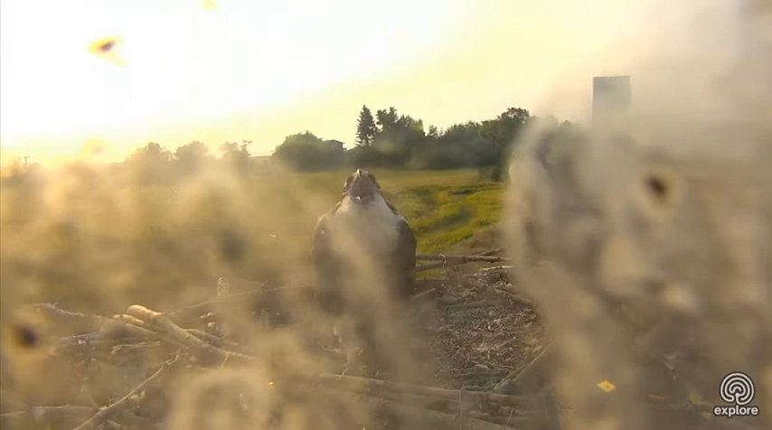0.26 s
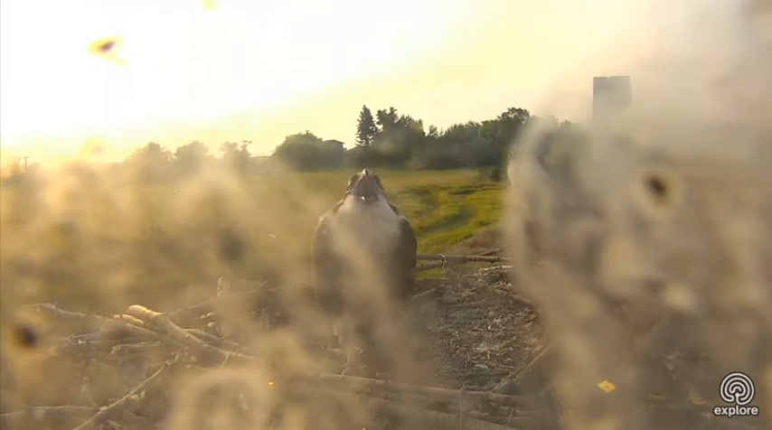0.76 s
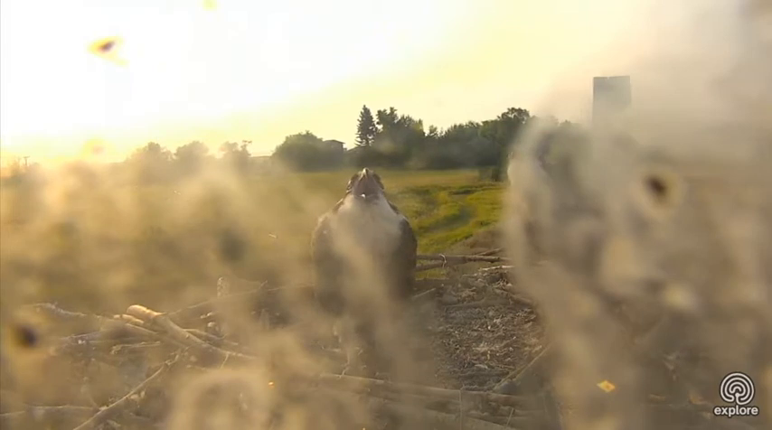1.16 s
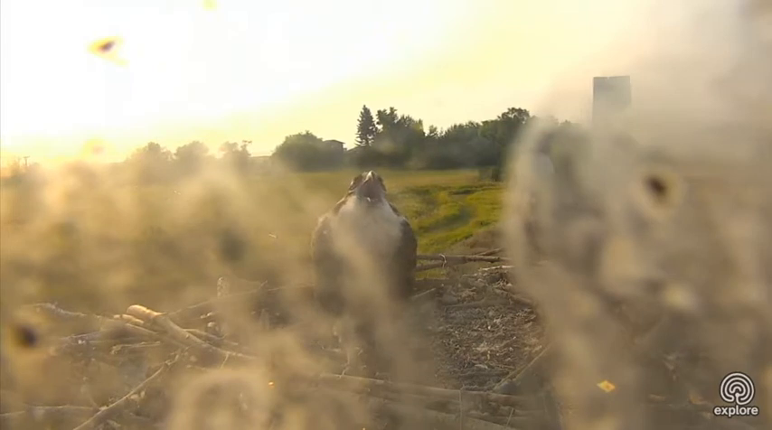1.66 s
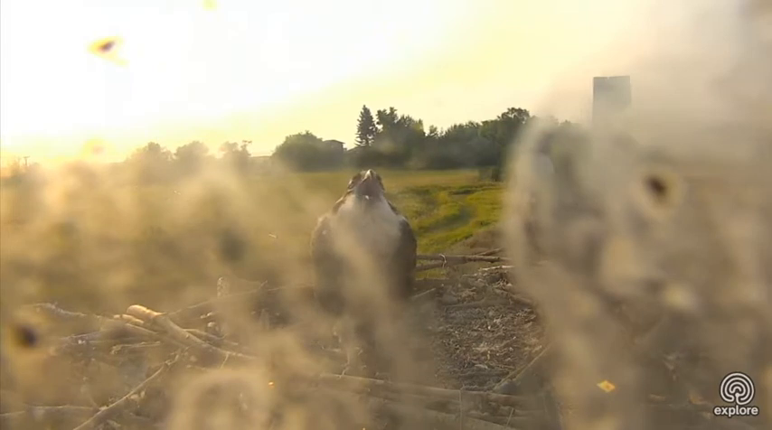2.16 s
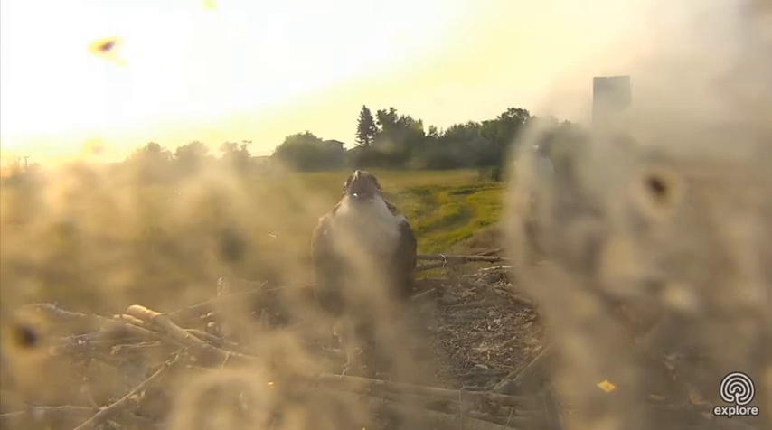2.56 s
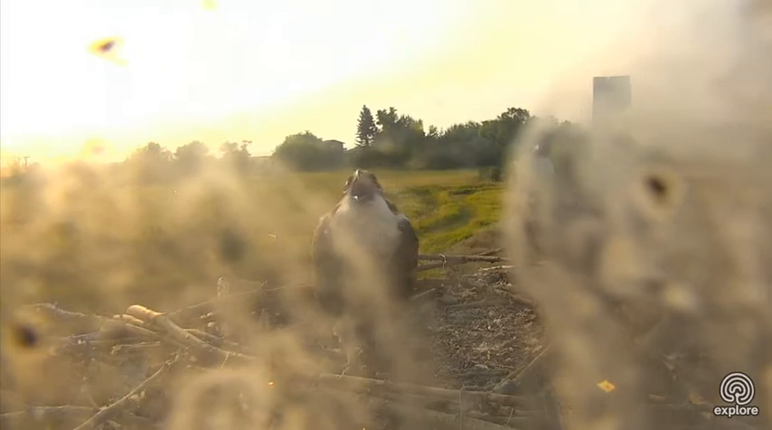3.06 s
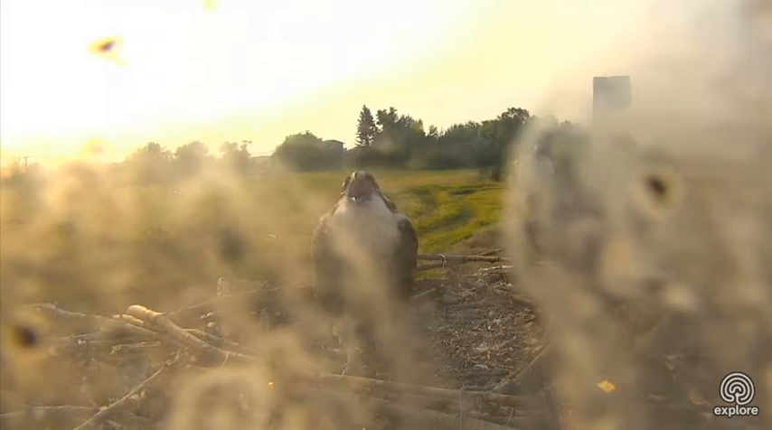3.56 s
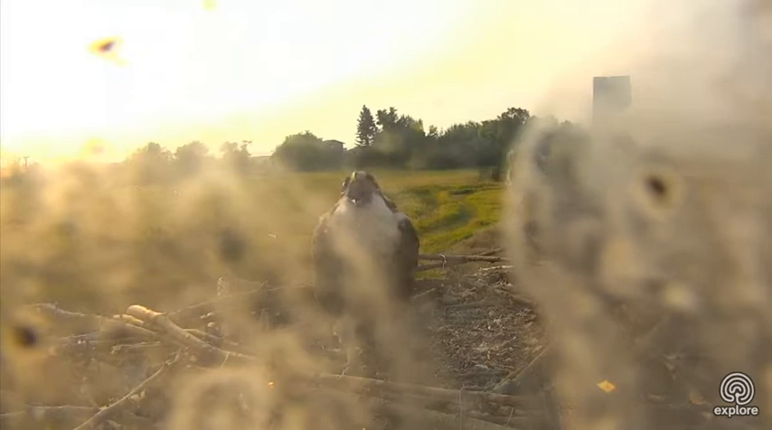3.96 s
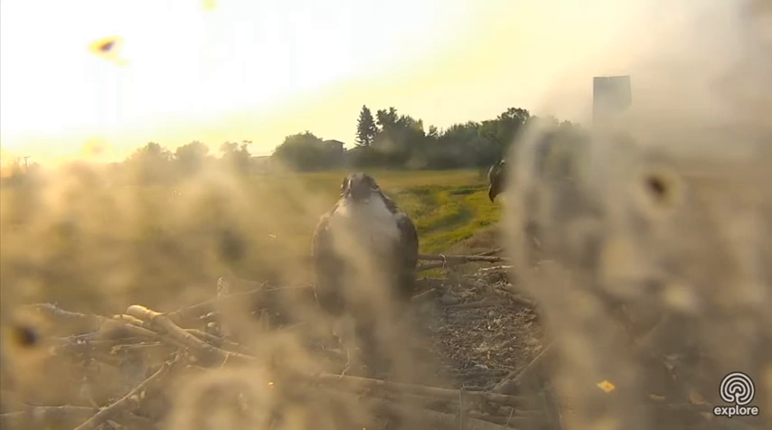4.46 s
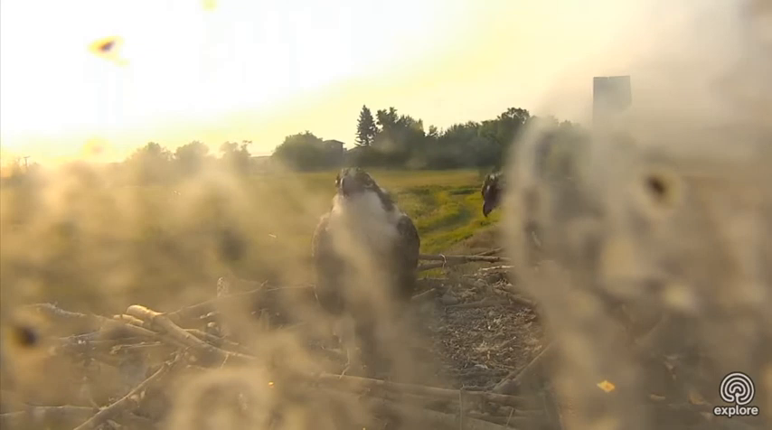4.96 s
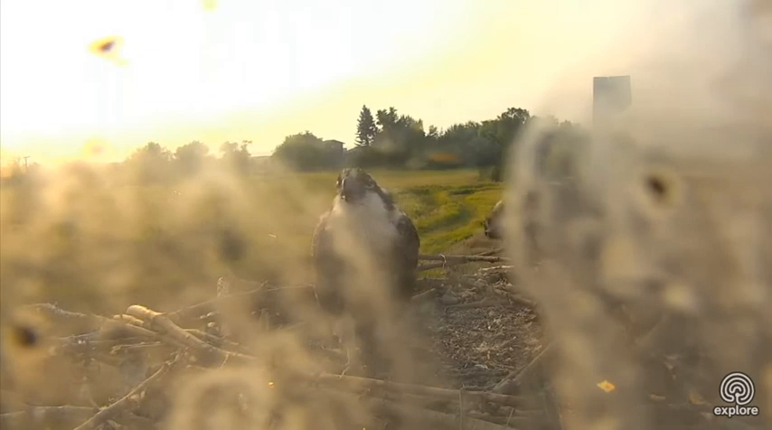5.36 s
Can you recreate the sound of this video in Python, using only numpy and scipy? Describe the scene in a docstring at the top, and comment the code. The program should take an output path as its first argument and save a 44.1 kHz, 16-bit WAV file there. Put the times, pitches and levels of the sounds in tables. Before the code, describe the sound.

A large bird of prey close by gives ten shrill, raspy whistled chirps in a row, pauses, then begins one more in quiet open country.

```python
"""At an osprey nest in open country, the bird calls close to the microphone: shrill chirps, a pause, one more.
A chirp scoops up in a low register after a tick, breaks into a raspy whistle, dips, climbs and falls away; the
first is already under way when the sound begins, the last has hardly any tick. Low cracks slip in under some
endings. Each voice is a phase-driven tone with overtones, period doubling and noise gated by the cycle.
Decaying noise gives a short bright tail and a faint far echo; shaped noise gives a low rumble and thin hiss."""
import sys
import numpy as np
from scipy import signal
from scipy.fft import rfft, irfft
from scipy.io import wavfile
from scipy.ndimage import uniform_filter1d

SR = 44100
rng = np.random.default_rng(int(sys.argv[2]) if len(sys.argv) > 2 else 0)


def unload_wav(signal):
    """Save mono or channel-first audio to the path in sys.argv[1] as 16-bit WAV at rate SR, clipped to [-1, 1]."""
    wavfile.write(
        sys.argv[1],
        SR,
        np.round(np.clip(np.atleast_2d(signal).T, -1, 1) * 32767).astype(np.int16),
    )


N = 248283
T = np.arange(N) / SR

# colour of the rasp: freq_hz, level_db
RASP_SPECTRUM = [(850, -35.5), (1450, -11.5), (1950, -15.5), (2600, 4), (3100, -9.5), (4200, 1.5),
                 (5100, -3), (5750, 0.5), (6500, -7), (7500, -2.5), (8400, -13), (11000, -20.5),
                 (12300, -33), (14600, -28)]
HUMP_MAX_S, HUMP_SHARE = 0.031, 0.37  # break to hump: latest time, and limit as a share of the time to the dip


def undb(db):
    """Decibels to gain."""
    return 10 ** (np.asarray(db) / 20)


def unit(x):
    """Scale to rms 1."""
    return x / np.sqrt(np.mean(x ** 2))


def gain_at(hz, points):
    """Gain at given frequencies, interpolated in dB over log frequency."""
    freq_hz, level_db = np.transpose(points)
    return undb(np.interp(np.log(hz + 1), np.log(freq_hz), level_db))


def colour(x, points):
    """Filter by a (Hz, dB) spectrum; rms 1."""
    freq_hz = np.arange(len(x) // 2 + 1) * SR / len(x)
    return unit(irfft(rfft(x) * gain_at(freq_hz, points), len(x)))


def wander(size, hz, width_hz):
    """Random motion in a band around hz; rms 1."""
    freq_hz = np.arange(size // 2 + 1) * SR / size
    spectrum = rfft(rng.standard_normal(size))
    return unit(irfft(spectrum / (1 + ((freq_hz - hz) / width_hz) ** 4), size))


def ramp(x):
    """Smooth step from 0 to 1."""
    return np.sin(np.pi / 2 * np.clip(x, 0, 1)) ** 2


def chirp(tick_s, break_s, end_s, dip_s, flare_s, hump_hz, dip_hz, peak_hz, end_hz, bend,
          level_db, attack_db, dip_db, octave_db, rasp_db, split):
    """One call: the low scoop, then the whistle; a soft attack all but loses its tick."""
    scoop_db, tick_db = -18.5 + attack_db, -25.2 + 2 * attack_db
    drift = 0.0012  # rms pitch drift, fraction
    # the voice splits on its way into the dip; above this pitch its side tones dissolve into hiss
    dissolve_hz, dissolve_width_hz = 3040, 420

    span = (T > break_s - 0.01) & (T < end_s + 0.03)
    u, length_s = T[span] - break_s, end_s - break_s
    hz = pitch(u, length_s, dip_s, hump_hz, dip_hz, peak_hz, end_hz, bend)
    hz = hz * (1 + drift * wander(len(u), 0, 20))
    tone, octave, rasp = strength(u, length_s, dip_s, flare_s, hz, attack_db, dip_db)

    dissolve = np.exp(-(np.maximum(hz - dissolve_hz, 0) / dissolve_width_hz) ** 2)
    share = np.clip(split * ramp(u / dip_s) * dissolve, 0, 1)
    # a tick before time 0 means the call is already under way when the sound begins, so only its whistle is
    # heard
    out = scoop(tick_s, break_s, scoop_db, tick_db) if tick_s > 0 else np.zeros(N)
    out[span] += whistle(u, length_s, hz, level_db + tone, octave + octave_db, rasp + rasp_db, share)
    return out


def pitch(u, length_s, dip_s, hump_hz, dip_hz, peak_hz, end_hz, bend):
    """Pitch u seconds after the register break: rise to a hump, dip, long climb, fall."""
    rise_hz, fall_max_s, fall_power = 265.7, 0.047, 1.4
    hump_s = min(HUMP_MAX_S, HUMP_SHARE * dip_s)
    fall_s = min(fall_max_s, length_s / 4)

    climb = np.clip((u - dip_s) / (length_s - fall_s - dip_s), 0, 1) ** bend
    hz = dip_hz + (peak_hz - dip_hz) * climb
    hz += (hump_hz - dip_hz) * ramp((dip_s - u) / (dip_s - hump_s))
    hz -= rise_hz * np.clip(1 - u / hump_s, 0, 1) ** 2
    fall = np.clip(1 - (length_s - u) / fall_s, 0, 1) ** fall_power
    return hz + (end_hz - hz) * fall


def strength(u, length_s, dip_s, flare_s, hz, attack_db, dip_db):
    """Course in dB of the tone, and of octave and rasp relative to it; both of these follow the pitch."""
    # the higher the pitch is pushed, the louder the rasp: pitch_hz, rasp_db (nominal, re chirp level)
    strain = [(2500, -20), (2750, -18), (2870, -14), (3000, -13), (3200, -11.5), (3450, -12)]
    # throat resonance that the octave passes through: octave_hz, level_db (nominal, re fundamental)
    octave_resonance = [(5000, -21), (5250, -16), (5500, -9.5), (5740, -3), (6000, -3.5), (6200, -3.5),
                        (6400, -5.5), (6600, -8.5), (6950, -10.5)]
    onset_db, onset_per_attack, recover_s = -4, 0.66, 0.1
    # shortly before the end the voice clears and flares, mostly in its octave
    flare_width_s, flare_db, flare_octave_db = 0.01, 0.9, 5
    # as the syrinx closes, the rasp goes first, then the octave and the tone
    rasp_fade_s, rasp_fade_db, close_db, close_octave_db = 0.022, -7.5, -3, -6
    # the rasp swells at the top of the climb and thins out in the dip
    top_lead_s, top_width_s, top_rasp_db, dip_rasp_db = 0.087, 0.053, 1.5, -0.5

    hump_s = min(HUMP_MAX_S, HUMP_SHARE * dip_s)
    past_flare_s = u - length_s + flare_s
    onset = np.clip(1 - u / hump_s, 0, 1) ** 2
    recovery = np.exp(-(np.maximum(u - dip_s, 0) / recover_s) ** 2)
    dip = ramp((u - hump_s) / (dip_s - hump_s)) * recovery
    top = np.exp(-((length_s - u - top_lead_s) / top_width_s) ** 2)
    flare = np.exp(-(past_flare_s / flare_width_s) ** 2)
    close = ramp(past_flare_s / flare_s)
    unrest_db = 0.5 * wander(len(u), 0, 25)  # now and then the rasp gains on the tone

    tone = onset_db * onset + dip_db * dip + flare_db * flare + close_db * close - unrest_db
    octave = np.interp(2 * hz, *np.transpose(octave_resonance))
    octave += flare_octave_db * flare + close_octave_db * close
    rasp = np.interp(hz, *np.transpose(strain)) + top_rasp_db * top + dip_rasp_db * dip + unrest_db / 2
    rasp += rasp_fade_db * ramp(past_flare_s / rasp_fade_s + 0.5)
    return tone + onset_per_attack * attack_db * onset, octave, rasp - tone


def scoop(start_s, stop_s, level_db, tick_db):
    """The syrinx pops open with a tick, then swells upward in its low register until it breaks."""
    # colour of the puff in the tick: freq_hz, level_db
    puff_spectrum = [(250, -26), (800, -8), (1500, -10), (2500, 2.5), (6500, -7), (9000, -17.5),
                     (15000, -35)]
    low_hz, high_hz, tick_peak_s = 2190, 2660, 0.0018
    overtone_db, fall_db = -8, -8  # level between 2nd and 3rd harmonic, change per harmonic
    puff_gain, hoarse_gain = 0.31, 0.1

    span = (T >= start_s) & (T < stop_s + 0.004)
    t, size = T[span] - start_s, span.sum()
    progress = t / (stop_s - start_s)
    hz = low_hz + (high_hz - low_hz) * progress ** 2.3
    phase = 2 * np.pi * np.cumsum(hz) / SR + 0.083 * wander(size, 0, 700)
    overtones = sum(undb(overtone_db + fall_db * (k - 2.5)) * np.cos(k * phase) for k in range(2, 5))
    thinning = 1 - 0.7 * ramp((progress - 0.6) / 0.16)
    tone = np.sqrt(2) * (np.cos(phase) + overtones * thinning)

    tick = (t / tick_peak_s) ** 2 * np.exp(2 - 2 * t / tick_peak_s)
    swell = ramp((progress - 0.12) / 0.68) * ramp((stop_s - start_s - t) / 0.0028 + 0.45)
    puff = colour(rng.standard_normal(size), puff_spectrum)
    hoarse = colour(rng.standard_normal(size), RASP_SPECTRUM)
    out = np.zeros(N)
    out[span] = undb(tick_db) * tick * (0.64 * tone + puff_gain * puff)
    out[span] += undb(level_db) * swell * (tone + hoarse_gain * hoarse)
    return out


def whistle(t, length_s, hz, level_db, octave_db, rasp_db, share):
    """The high register: a membrane tone that trembles and hisses more as it is driven into roughness."""
    # how the throat passes the overtones above the octave: freq_hz, level_db
    throat = [(6800, -13), (8300, -20.5), (9200, -20), (10000, -28.5), (11500, -40.5), (15000, -51.5)]
    waver, flutter_rad, shimmer, scatter = 0.011, 0.053, 0.16, 0.032
    octave_trim_db, rasp_trim_db, burst_db = -1, 4.5, 0.76
    gating, brightening, release_s = 0.65, 0.55, 0.0105

    size = len(t)
    # period doubling and hoarse undertone: plain voice, plus what a fully split voice adds
    half_db, hoarse_db = -36.5 + 30 * share, -28 + 22 * share
    rough = undb(np.minimum(rasp_db, -6) + 11.5)
    gate = ramp(t / 0.004 + 1.05) * ramp((length_s - t) / release_s + 0.63)

    hz = uniform_filter1d(hz, size=440)  # the muscles of the syrinx round every turn of pitch
    hz = hz * (1 - 5 * np.maximum(t - length_s, 0))  # the pitch sinks on as the membranes slacken
    hz = hz * (1 + waver * rough * (1 - share) ** 2 * wander(size, 0, 190))
    phase = 2 * np.pi * np.cumsum(hz) / SR + flutter_rad * rough * wander(size, 370, 270)
    tone = np.cos(phase) + np.sqrt(gate) * undb(octave_db + octave_trim_db) * np.cos(2 * phase)

    # the high overtones grow with the octave and are the first to fade
    overtones = sum(gain_at(k * hz, throat) * np.sin(k * phase) for k in range(3, 5))
    tone += gate * undb(brightening * np.minimum(octave_db + 4, 2)) * overtones

    # alternate cycles differ a little, which puts faint lines halfway between the harmonics
    half = phase / 2 + 0.4 * rough * wander(size, 0, 45)
    doubling = 0.51 * np.cos(half) + 0.51 * np.cos(half + phase) + 0.34 * np.cos(half + 2 * phase)
    tone += undb(half_db) * doubling
    tremble = 1 + shimmer * rough * wander(size, 280, 450) + scatter * wander(size, 0, 50)
    tone *= np.sqrt(2) * tremble

    # air escapes in one turbulent puff per cycle, and the roughness comes in short bursts
    puffs = rng.standard_normal(size) * (1 + gating * np.sin(phase)) ** 2
    hiss = colour(puffs, RASP_SPECTRUM)
    grit = np.sqrt(1 - share) * hiss + np.sqrt(share) * side_tones(phase)
    grit *= undb(burst_db * wander(size, 0, 45))
    grit += undb(hoarse_db) * wander(size, 1850, 300)
    return gate * undb(level_db) * (tone + undb(rasp_db + rasp_trim_db) * grit)


def side_tones(phase):
    """Slower membrane modes beat against the tone: partials beside each harmonic, coming and going."""
    ratios, blur_rad = (0.2, 0.29, 0.39), 1.3  # mode to tone frequency, rms phase blur
    size = len(phase)
    beats = sum(wander(size, 0, 3.9) * np.cos(r * phase + blur_rad * wander(size, 0, 25)) for r in ratios)
    harmonics = sum(np.cos(k * phase) for k in range(1, 5))
    return colour(beats * harmonics, RASP_SPECTRUM)


def crack(at_s, level_db):
    """The low register catches for an instant and slides down under the whistle."""
    mid_hz, slide_hz, half_s, overtone_db = 2500, 330, 0.0041, -8  # slide is to either side of the middle
    span = np.abs(T - at_s) < half_s
    u = (T[span] - at_s) / half_s
    phase = 2 * np.pi * np.cumsum(mid_hz - slide_hz * u) / SR
    phase += 0.03 * rng.standard_normal(len(u)).cumsum()
    tone = np.cos(phase) + undb(overtone_db) * np.cos(2 * phase)
    out = np.zeros(N)
    out[span] = np.sqrt(2) * undb(level_db) * ramp(1 - np.abs(u)) * tone
    return out


def echo(x, level_db, t60_s, delay_s):
    """Diffuse sound that arrives after a delay and dies away: convolution with decaying noise."""
    tail = rng.standard_normal(N) * undb(-60 * T / t60_s) * (T > delay_s)
    tail = tail / np.sqrt(np.sum(tail ** 2))
    return undb(level_db) * signal.fftconvolve(x, tail)[:N]


def air():
    """A distant rumble that swells slowly, with a steady thin hiss above it, both from one noise."""
    # open-air background: freq_hz, density_db (relative, per Hz)
    air_spectrum = [(15, -7), (42, 0.5), (85, -12), (130, -7), (210, -5), (255, -11.5), (300, -6),
                    (400, -17), (490, -13), (650, -23), (1000, -29.5), (2500, -32), (4300, -40),
                    (6500, -34), (8000, -47), (15000, -59.5)]
    # swell of the rumble: time_s, level_db
    swell_points = [(0, 1), (1.42, -3), (1.6, 3.5), (1.95, 3), (2.2, 1), (3.8, -0.5), (4.2, 2.5),
                    (4.7, -1.5), (5.6, -1.5)]
    noise = colour(rng.standard_normal(N), air_spectrum)
    rumble = signal.sosfiltfilt(signal.butter(2, 700, fs=SR, output="sos"), noise)
    swell_db = np.interp(T, *np.transpose(swell_points)) + 0.7 * wander(N, 0, 4)
    return undb(-53) * (noise + (undb(swell_db) - 1) * rumble)


def scene():
    """The bird, a short noisy tail, a faint far echo from trees and the air, on one microphone."""
    # calls: tick_s, break_s, end_s, break_to_dip_s, flare_to_end_s, hump_hz, dip_hz, peak_hz, end_hz,
    # climb_bend (power, 1 = straight), level_db (nominal), attack_db, dip_change_db,
    # octave_offset_db, rasp_offset_db, voice_split (0-1)
    chirps = [ (-.034, -0.017, .259, .08, 0.017, 3246, 3080, 3428, 2750, 1.15, -21.5, 0, -1.5, -1, 0, 0.14),
              (.3709, .390, 0.6, 0.085, .012, 3290, 3153, 3340, 2690, .6, -21.6, 0, -0.5, -.5, 0, .1),
              (0.7041, .724, 1.0974, 0.088, 0.013, 3205, 2942, 3463, 2735, 1.03, -21.5, 0.5, -3, .5, 0, 0.15),
              (1.2183, 1.236, 1.487, 0.085, 0.019, 3337, 3168, 3385, 2740, 0.9, -21.5, 0, -1, -.5, 0.46, .08),
              (1.5988, 1.619, 1.975, 0.088, 0.0098, 3242, 3034, 3455, 2695, 1.14, -22, 0, -2.5, .5, .3, 0.1),
              (2.0953, 2.115, 2.368, 0.091, .014, 3285, 3130, 3367, 2776, 1, -21.5, -.5, -1.3, -.5, 0, 0.077),
              (2.485, 2.504, 2.825, 0.087, 0.023, 3282, 3005, 3418, 2790, 0.96, -21.5, -.5, -2.5, 0, 0, 0.066),
              (2.9828, 3.003, 3.371, .094, .016, 3100, 2868, 3412, 2716, 1.1, -21, 0.5, 0, .5, -0.18, .3),
              (3.5104, 3.53, 3.836, 0.084, 0.02, 3202, 2989, 3292, 2720, 1.1, -20.7, 1, -3, 0, -.5, 0.23),
              (4.0076, 4.03, 4.63, .106, 0.014, 3042, 2750, 3245, 2700, .76, -21, 1, 2.5, 1.2, -1.5, .48),
              (5.507, 5.522, 5.617, 0.048, 0.013, 2725, 2884, 2860, 2580, 1.1, -21, -11, -0.5, 0, 0.11, 0.4),
              ]
    # cracks into the low register as a chirp dies: time_s, level_db
    cracks = [(.246, -28), (.588, -28.5), (1.088, -28.5), (1.972, -34), (2.815, -27.5), (3.362, -28)]
    bird = sum(chirp(*row) for row in chirps) + sum(crack(*row) for row in cracks)
    # a short, bright, hissy tail follows each call
    treble = signal.sosfilt(signal.butter(4, 7500, "high", fs=SR, output="sos"), bird)
    short_tail = echo(bird + undb(11.5) * treble, level_db=-28.5, t60_s=0.071, delay_s=0.006)
    trees = echo(bird, level_db=-50.5, t60_s=1.3, delay_s=0.036)
    mono = bird + short_tail + trees + air()
    return np.array([mono, mono])


def record(dry):
    """The camera cuts the top: a steep elliptic low-pass."""
    top_hz = 15500
    return signal.sosfilt(signal.ellip(10, 0.2, 80, top_hz, fs=SR, output="sos"), dry)


dry = scene()
out = record(dry)
unload_wav(out)
```